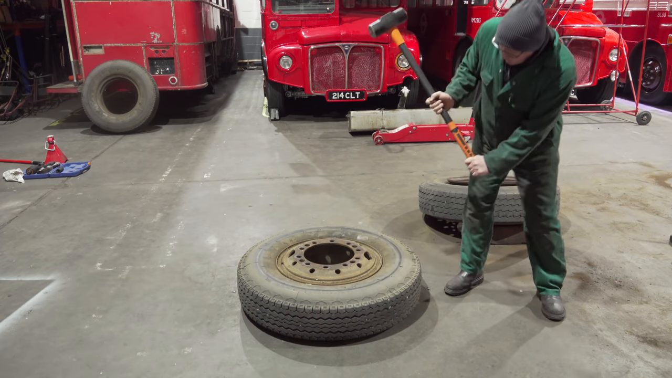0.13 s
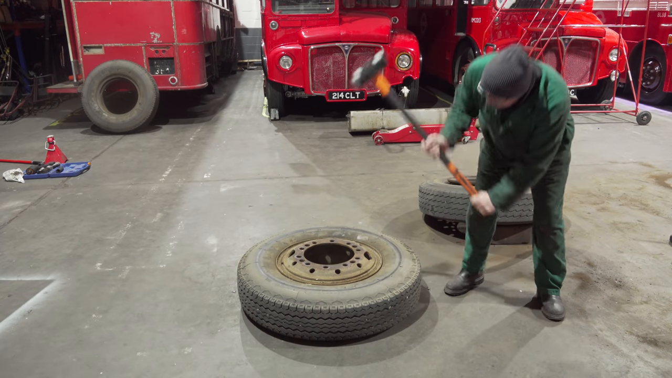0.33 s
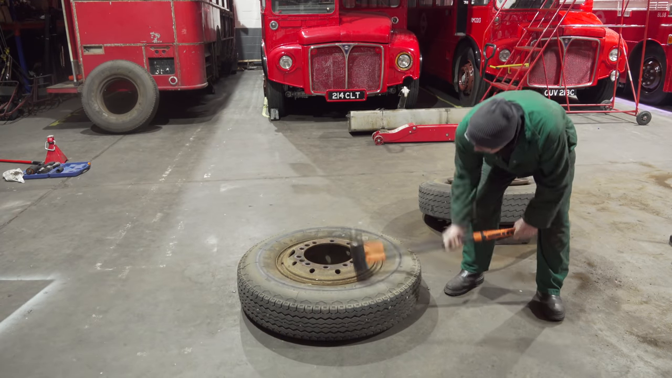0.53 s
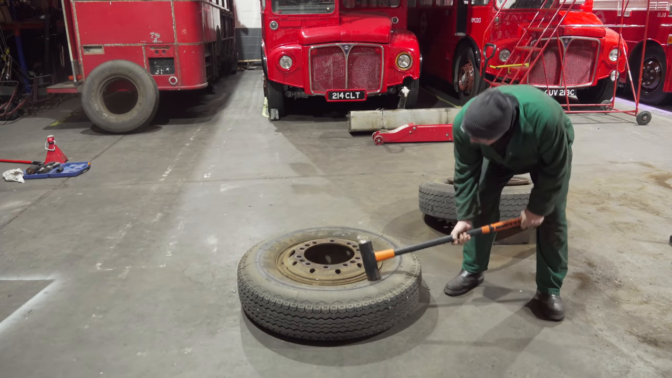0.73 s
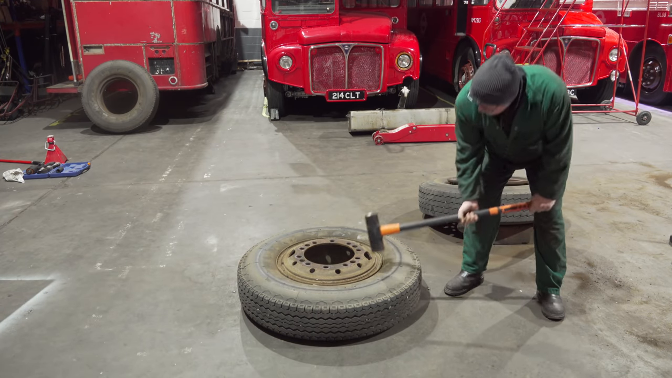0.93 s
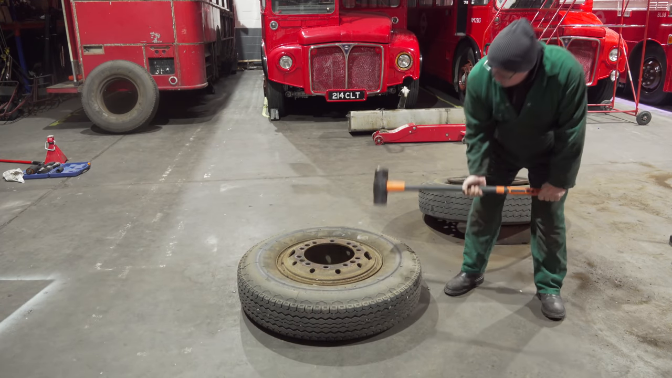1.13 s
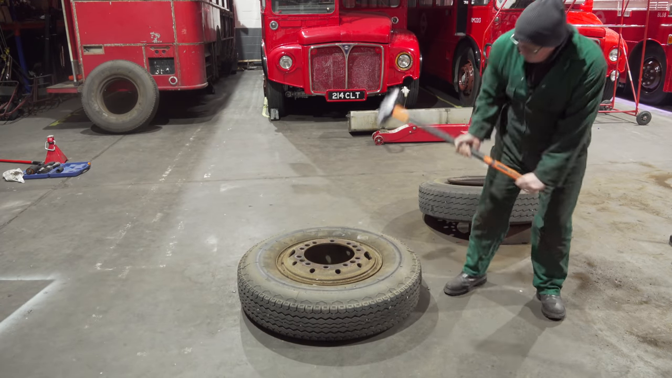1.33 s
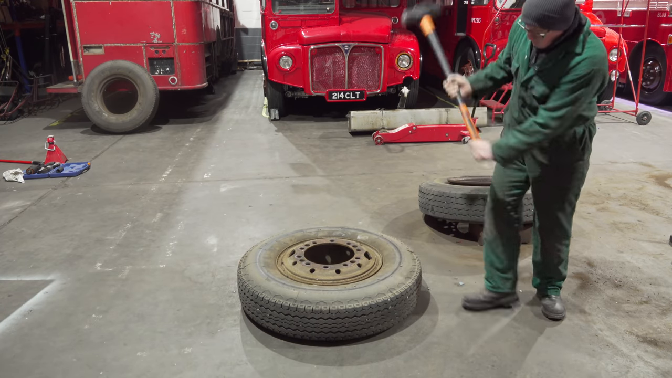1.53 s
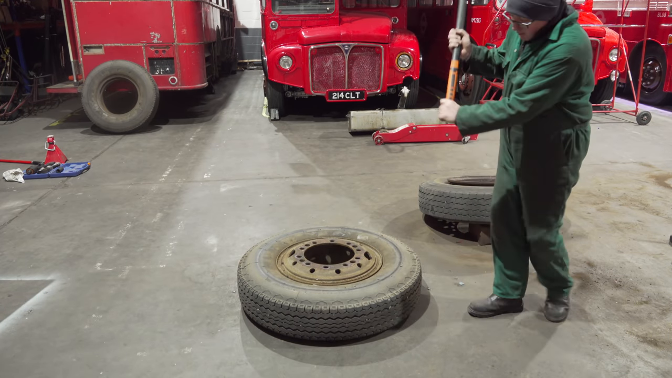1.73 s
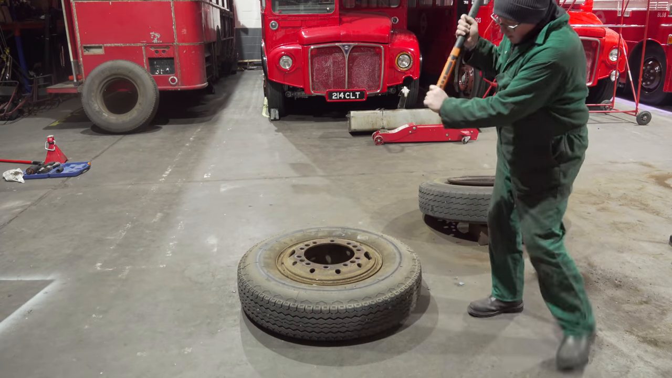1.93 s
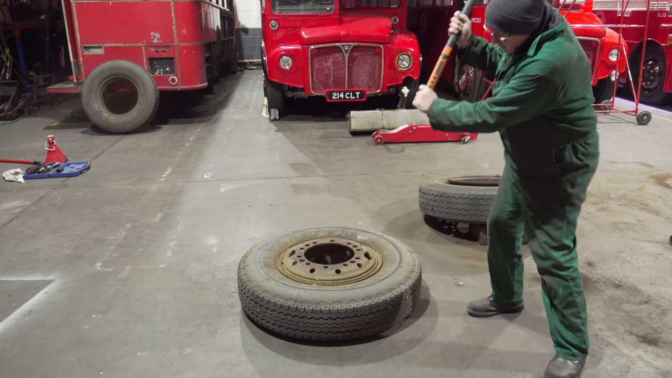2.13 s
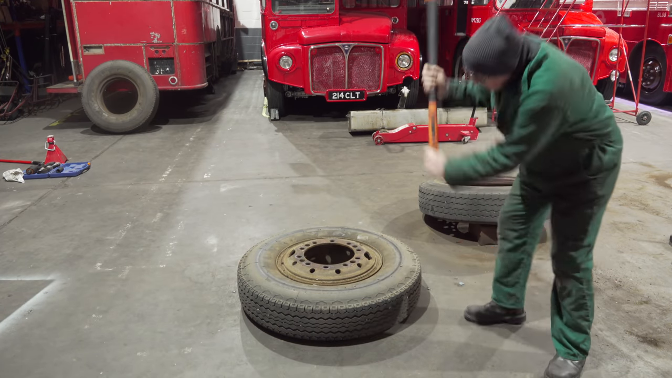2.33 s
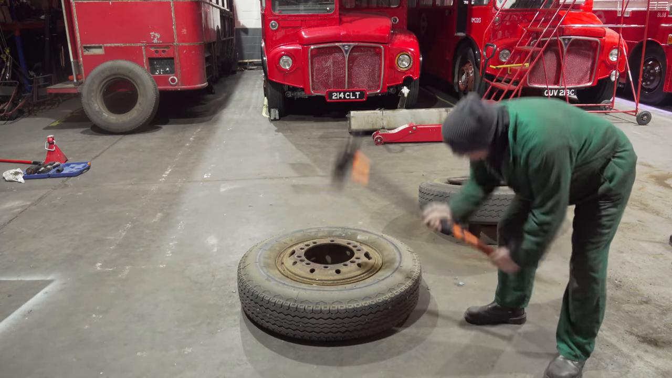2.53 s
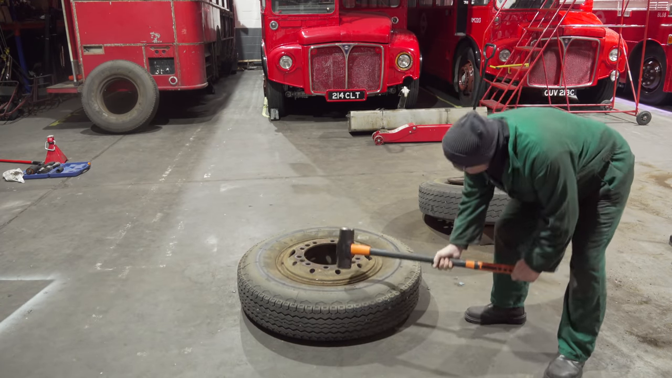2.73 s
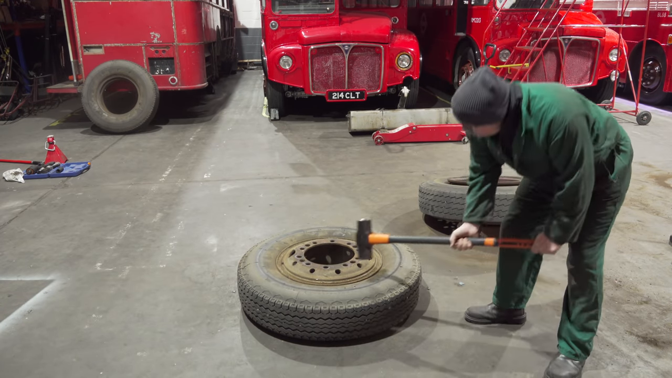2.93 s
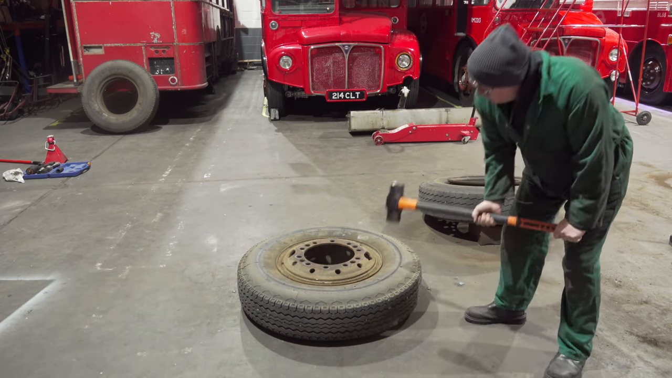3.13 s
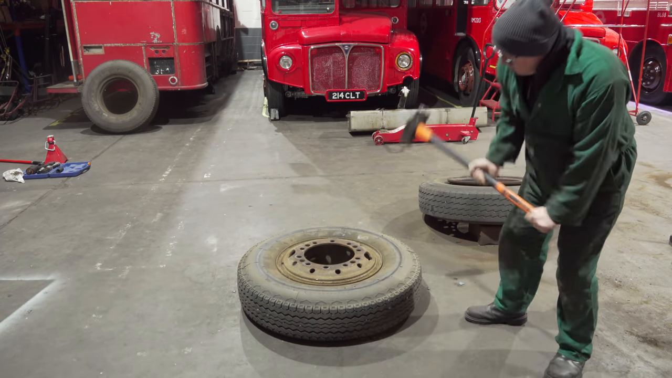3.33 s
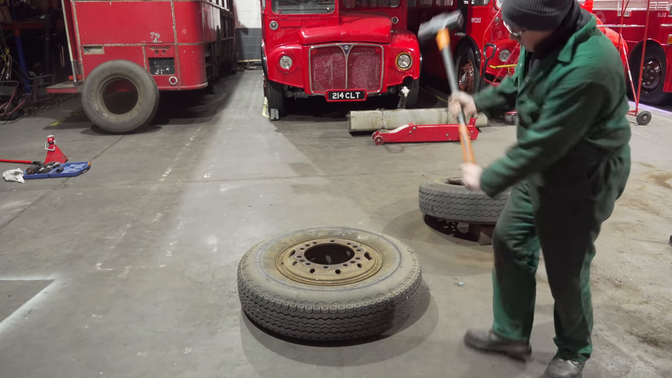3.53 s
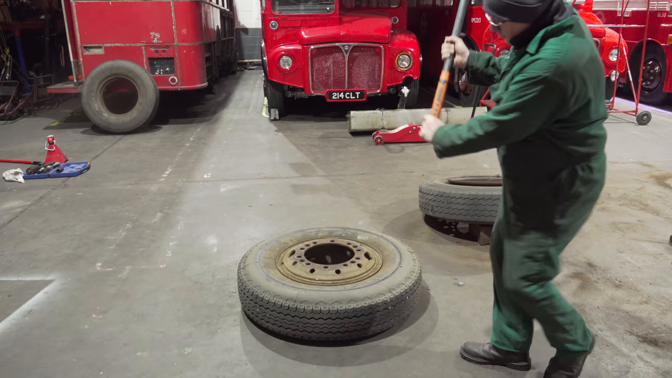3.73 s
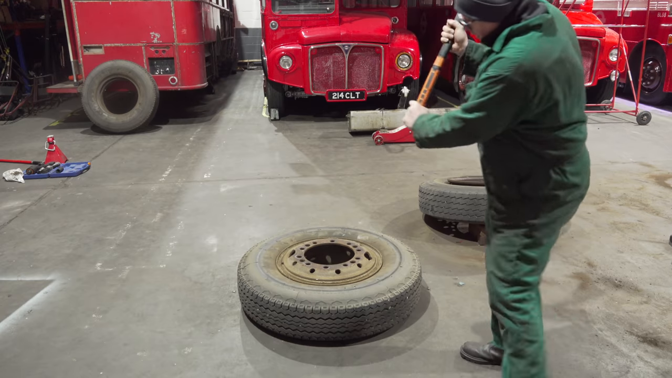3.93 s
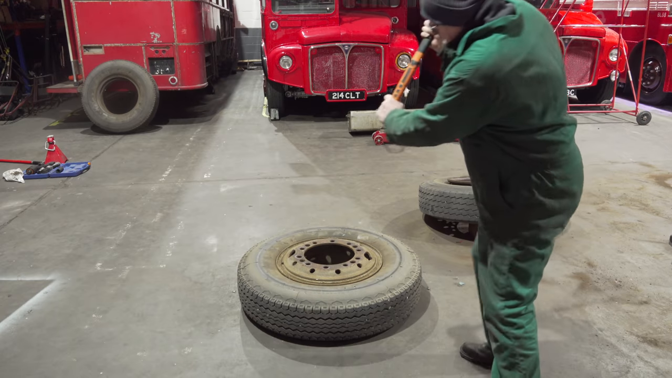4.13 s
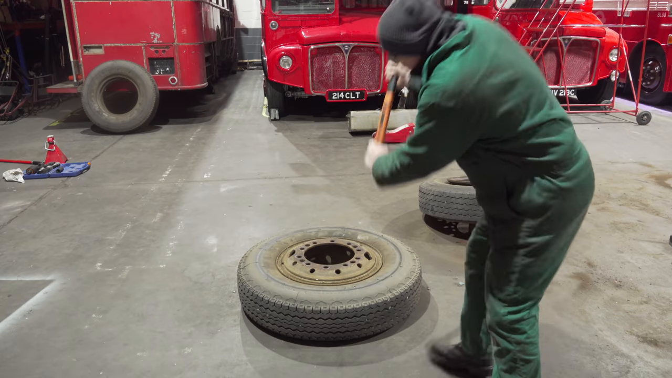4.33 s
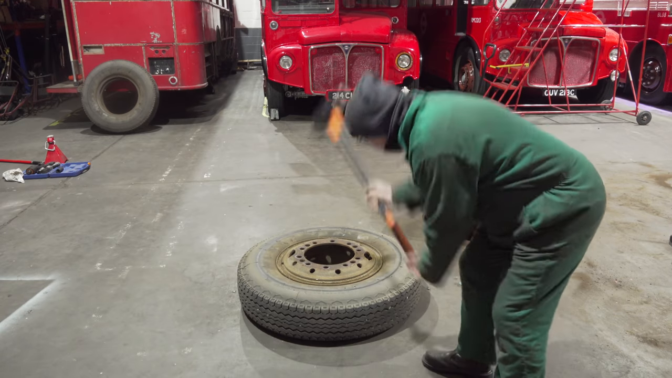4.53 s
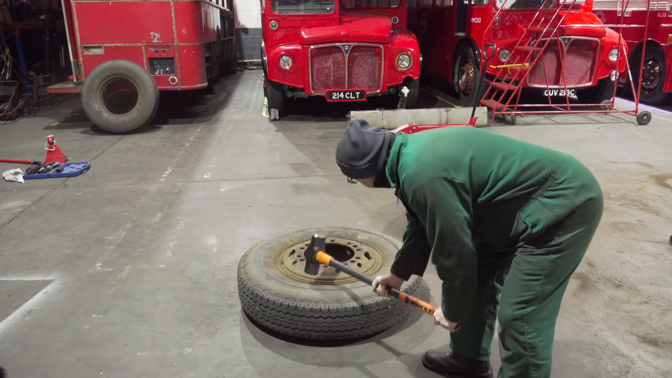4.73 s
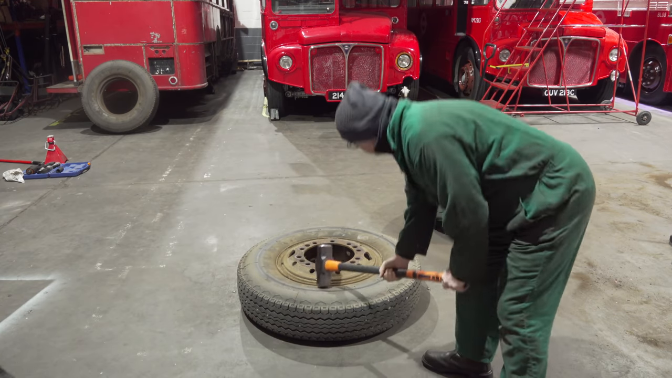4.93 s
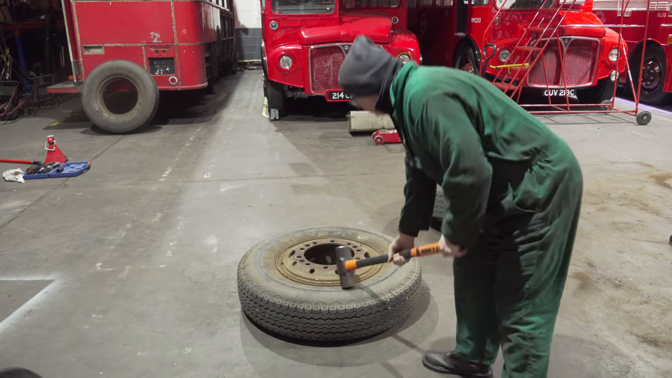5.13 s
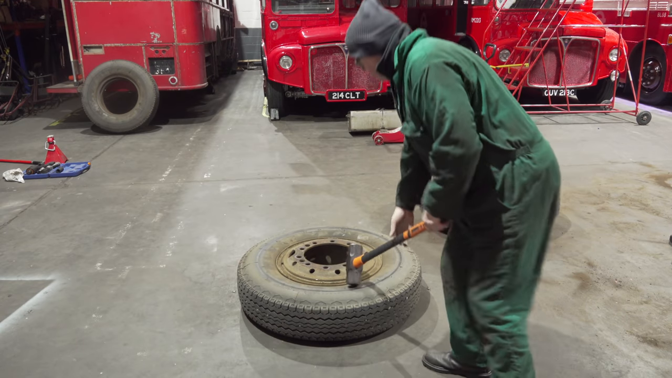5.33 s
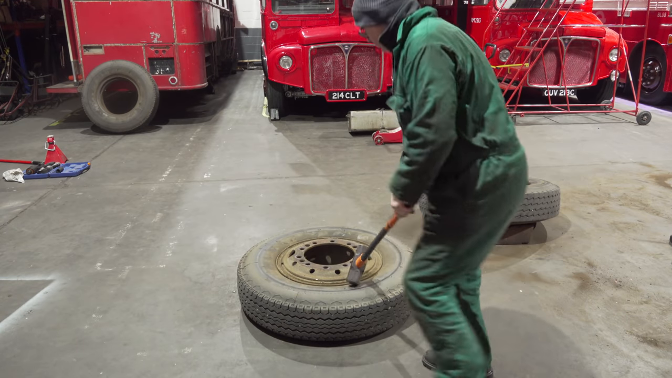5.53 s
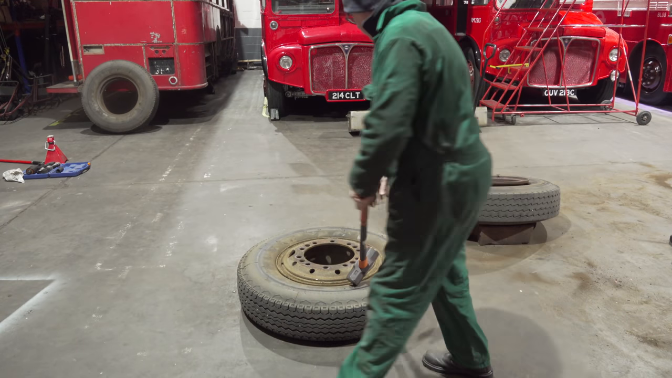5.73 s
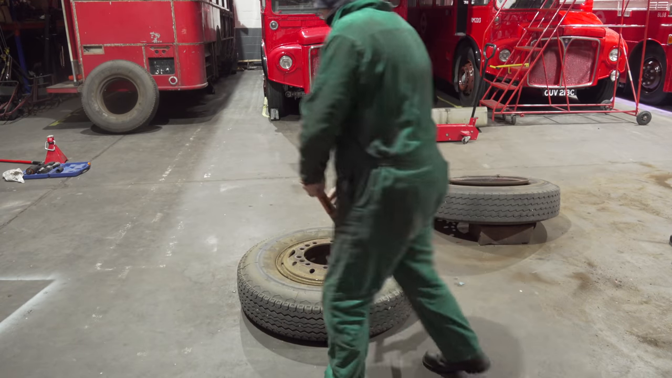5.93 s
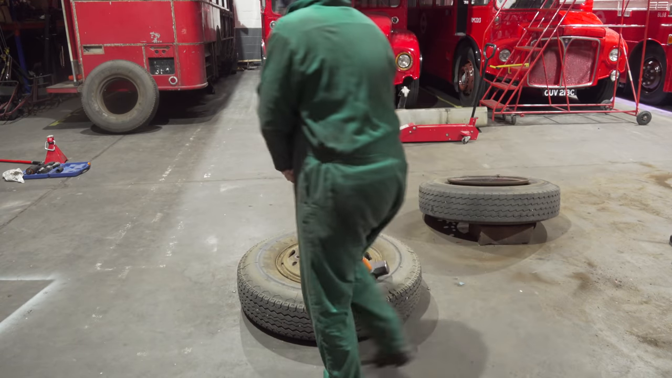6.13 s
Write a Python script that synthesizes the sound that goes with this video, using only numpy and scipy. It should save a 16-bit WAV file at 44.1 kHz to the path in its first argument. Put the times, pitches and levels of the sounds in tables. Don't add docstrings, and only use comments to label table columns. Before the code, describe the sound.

Three widely spaced sledgehammer blows on a heavy tyre with a steel rim, about two seconds apart. Each is a very loud, blunt thump fused with a bright, noisy metal crack and short rim ring, followed by a diffuse hall tail that rises as the limiter recovers. Between them come quiet boot taps, grit crunches, cloth rubs, a hollow panel knock and loose steel rattling. Faint hiss underneath; the mono microphone is near the work in a big hard-walled garage.

```python
import sys
import numpy as np
from scipy import signal
from scipy.fft import rfft, irfft
from scipy.io import wavfile
from scipy.ndimage import minimum_filter1d

SR = 44100
rng = np.random.default_rng(int(sys.argv[2]) if len(sys.argv) > 2 else 0)


def undo_db(level):
    steps = np.asarray(level, float) / 20
    return 10 ** steps


def waveform_to_disk(signal):
    frames = np.transpose(np.atleast_2d(signal))
    scaled = np.clip(frames, -1, 1) * 32767
    samples = np.round(scaled).astype(np.int16)
    wavfile.write(sys.argv[1], SR, samples)


N = 276938

# (frequency [Hz], level [dB], t60 [s])
PANEL_MODES = [(171, -12, 0.088), (520, -1.5, .015), (850, -3, .02), (1180, -6, .022), (2175, -15, .05),
               (2420, -17, .03), (3400, -27, .02)]


def at_hz(points, hz):
    table_hz, values = np.array(points).T
    return np.interp(np.log(hz + 1), np.log(table_hz), values)


def add(track, s, sound):
    i = round(s * SR)
    sound = sound[max(-i, 0):N - i]
    start = max(i, 0)
    track[start:start + len(sound)] += sound


def damped(hz, t60_s, length_s):
    t = np.arange(round(length_s * SR)) / SR
    return np.sin(2 * np.pi * hz * t) * undo_db(-60 * t / t60_s)


def resonate(x, hz, width_hz):
    r = np.exp(-np.pi * width_hz / SR)
    zeros = np.array([1, 0, -1]) * (1 - r * r) / 2
    poles = [1, -2 * r * np.cos(2 * np.pi * hz / SR), r * r]
    return signal.lfilter(zeros, poles, x)


def floor():
    # (frequency [Hz], density [dB per Hz])
    noise_spectrum = [(25, 3), (60, -7), (120, -8.5), (200, -2.5), (500, -4.5), (1000, -2.5), (2000, -2.5),
                      (4000, -6), (6300, -13), (10000, -17), (15700, -16), (16300, -54)]
    rms_db = -70.5
    shape = undo_db(at_hz(noise_spectrum, np.arange(N // 2 + 1) * SR / N))
    hiss = irfft(rfft(rng.standard_normal(N)) * shape, N)
    return undo_db(rms_db) * hiss / hiss.std()


def scuffs():
    # (start [s], length [s], rms [dB], centre [Hz])
    drags = [(-.01, 0.068, -52.5, 3460), (1.59, 0.062, -59.5, 4020), (2.042, 0.048, -58.5, 3300),
             (2.174, 0.1, -67, 2800), (2.352, 0.076, -58.5, 3800), (3.598, 0.069, -56, 3400),
             (4.408, 0.032, -62, 2800), (4.624, .028, -47, 3000), (4.652, 0.054, -49.5, 2800),
             (5.762, 0.088, -72.5, 4990)]
    # (start [s], length [s], rms [dB], centre [Hz])
    slides = [(.022, .027, -48.5, 3780), (0.001, 0.029, -55, 9400), (.046, 0.28, -70, 2160),
              (0.001, 0.074, -62, 910), (1.699, .17, -65, 4570), (1.959, 0.044, -65.5, 8500),
              (2.055, 0.023, -67, 4730), (2.387, .035, -59, 2625), (3.702, 0.15, -74.5, 4100),
              (3.957, 0.094, -69.5, 6700), (4.006, 0.035, -61, 4600), (4.034, 0.088, -74.5, 3520),
              (4.149, 0.087, -66.5, 3800), (4.258, 0.01, -68.5, 7290), (4.335, 0.016, -71, 3980),
              (4.351, 0.14, -64.5, 260), (4.451, 0.012, -61.5, 2980), (3.621, .054, -58.5, 2460),
              (5.668, .021, -61, 5500), (5.812, .024, -70, 3516), (6.209, .094, -67, 305)]
    # (start [s], length [s], rms [dB], centre [Hz])
    hums = [(3.5, .14, -69.5, 170), (5.61, 0.23, -76, 168), (1.7, .12, -72.5, 670), (2.2, .15, -79, 1850),
            (.062, .2, -72.5, 1700)]

    white = rng.standard_normal(N + SR)
    grit = white * undo_db(3 * np.minimum(rng.exponential(1, N + SR), 4))
    below_9k = signal.butter(4, 9000, fs=SR, output="sos")
    grit = 0.3 * grit + 0.8 * signal.sosfiltfilt(below_9k, grit)

    out = np.zeros(N)
    for rows, octaves, rise in [(drags, 3.3, 0.4), (slides, 1.3, 0.42), (hums, 0.22, 0.1)]:
        for s, length_s, rms_db, hz in rows:
            count = round(length_s * SR)
            edges_hz = np.clip(hz * 2 ** (np.array([-0.5, 0.5]) * octaves), 40, 18000)
            band = signal.butter(3, edges_hz, "band", fs=SR, output="sos")
            start = round(s * SR) + 2000
            grains = signal.sosfilt(band, grit[start:][:count])
            stroke = np.interp(np.arange(count) / count, [0, rise, 0.8, 1], [0.38, 0.92, 0.57, 0.37])
            add(out, s, undo_db(rms_db) * stroke * grains / grains.std())
    return out


def knocks():
    # (frequency [Hz], level [dB], t60 [s])
    boot_modes = [(174, -10.5, 0.07), (403.4, -6.5, 0.011), (720, -1.5, 0.013), (1230, -2.5, 0.0034),
                  (2900, -15, .004)]
    stud_modes = [(8080, -3.5, .012), (14950, -1, .03)]
    loose_modes = [(165, -9.5, 0.031), (330, -3.5, .015), (870, -6.5, .012), (1870, -2.5, .02),
                   (2470, 2, 0.02), (3430, -8, .012), (4400, 2.5, 0.011), (6190, -5.5, .01),
                   (8200, -10.5, .008), (11100, -17.5, .015), (12600, -21, .02), (14650, -16.5, .02)]
    zip_modes = [(2700, -4, .01), (5200, -3, .012), (7330, -1, .012), (11650, -3, .022), (14800, -10, .018)]
    wheel_modes = [(100, -17, .05), (175.4, -9.5, 0.17), (271.4, -10.5, 0.044), (432, -0.5, 0.0083),
                   (745, -9, .014), (1233, -26, .12), (1497, -21.5, .14), (2810, -15, 0.0087)]
    # (time [s], level [dB], hardness [dB per octave])
    footfalls = [(.476, -68.5, -1.5), (1.657, -46.5, 3.8), (2.038, -50, 2), (2.402, -45, 5.5),
                 (3.991, -51, -.5), (4.456, -61.5, -1.5), (5.955, -61.5, -1)]
    stud_ticks = [(.277, -56.5, 0.3), (.37, -72, -0.2), (.41, -78, 1.5), (2.371, -54, 3)]
    panel_knocks = [
        (2.554, -37, 1),
    ]
    rattles = [(4.623, -45.5, -3), (4.628, -42, 0.3), (4.633, -48.5, 2.5), (4.641, -51.5, 1.5),
               (4.646, -53.5, 1.5), (4.6825, -52, 3), (4.687, -56, 3), (4.7075, -43, 8)]
    # (time [s], level [dB])
    zip_ticks = [(5.637, -57), (5.675, -60), (5.712, -66)]
    # (time [s], level [dB], frequency [Hz])
    grit_snaps = [(.051, -48, 2480), (.087, -56, 2500), (.147, -51.5, 2800), (.2323, -48, 1960),
                  (0.233, -50.5, 3290), (1.967, -47.5, 5060), (2.348, -61, 498), (2.35, -54, 2023),
                  (2.497, -55, 10490), (3.499, -46, 3850), (3.542, -46, 3500), (4.062, -57, 413),
                  (4.4062, -55, 800), (4.4067, -56, 1696), (4.471, -61, 540), (4.598, -56.5, 446)]

    # modes, hits, share reaching the hall [dB]
    bodies = [(boot_modes, footfalls, -6.5),
              (stud_modes, stud_ticks, -12),
              (PANEL_MODES, panel_knocks, -5.5),
              (loose_modes, rattles, -7),
              (zip_modes, [(s, db, 0) for s, db in zip_ticks], -12),
              (wheel_modes, [(6.114, -40.5, 0)], -5)]
    strikes = []
    for modes, hits, hall_db in bodies:
        for s, db, hard_db in hits:
            for hz, mode_db, t60_s in modes:
                level_db = db + mode_db + hard_db * np.log2(hz / 1000) + rng.normal(0, 1.5)
                strikes.append((s, level_db, hz * rng.normal(1, 0.01), t60_s, hall_db))
    for s, db, hz in grit_snaps:
        strikes.append((s, db, hz, 14 / hz, -12))

    near, sent = np.zeros((2, N))
    small = signal.butter(2, 110, "high", fs=SR, output="sos")
    for s, db, hz, t60_s, hall_db in strikes:
        touch = rng.standard_normal(60)
        contact = np.r_[1, 0.3 * touch * np.exp(-np.arange(60) / 8)]
        sound = signal.sosfilt(small, np.convolve(damped(hz, t60_s, 0.21), contact))
        sound *= undo_db(db) / np.abs(sound).max()
        add(near, s, sound)
        add(sent, s, undo_db(hall_db) * sound)
    return near, sent


def hall(near, around):
    # (frequency [Hz], t60 [s])
    decay_t60 = [(60, 1.4), (160, 0.91), (420, 1.2), (1100, 1.413), (2900, 1.282), (4300, 1.106),
                 (6000, 0.86), (9000, 0.61), (15000, 0.3)]
    # (frequency [Hz], level [dB])
    colour = [(30, -11.5), (80, -8.5), (200, 7), (500, 2), (900, -0.5), (1300, -4.5), (2500, 1), (4500, 0),
              (8000, 0.5), (15000, -3)]
    # (delay [s], level [dB])
    echoes = [(.0065, -11), (0.0242, -11.5), (0.032, -10.5), (.047, -20)]
    tail_db, build_up_s = 1 - 36, 0.028

    count = 2 * SR
    t = np.arange(count) / SR
    edges_hz = 22 * 2 ** np.arange(0, 9.8, 1 / 5)
    white = rng.standard_normal((2, count))
    tail = np.zeros(count)
    for k, (low, high) in enumerate(zip(edges_hz, edges_hz[1:])):
        hz = np.sqrt(low * high)
        band = signal.butter(2, [low, high], "band", fs=SR, output="sos")
        decay_db = at_hz(colour, hz) - 60 * t / at_hz(decay_t60, hz)
        tail += signal.sosfilt(band, white[k % 2]) * undo_db(decay_db)
    tail *= undo_db(tail_db) * (1 - np.exp(-(t / build_up_s) ** 2))

    out = signal.fftconvolve(around, tail)[:N]
    for delay_s, db in echoes:
        add(out, delay_s, undo_db(db) * near)
    return out


def steel(force):
    # (frequency [Hz], width [Hz], level [dB])
    resonances = [(910, 583, 1.5), (2800, 1680, -3), (4100, 1196, 1), (6700, 2000, -5), (8050, 1500, -6),
                  (11160, 1100, -15), (15100, 6900, -21)]
    out = 0
    for k, (hz, width_hz, db) in enumerate(resonances):
        out = out + (-1) ** k * undo_db(db) * resonate(force, hz, width_hz)
    return out


def blow(s, thump_db, thump_hz, crack_db, delay_s):
    # (frequency [Hz], level [dB], t60 [s])
    rim_modes = [(137.8, 3.5, 0.32), (640, -13, 0.1), (738, -2, 0.28), (1013, 5, 0.17), (1262, -2, 0.44),
                 (1493, 3, 0.36), (1910, -6.5, 0.2), (2480, -4, .12), (2540, -5.5, 0.1), (2894, -9, 0.2),
                 (3650, -9, 0.14), (3970, -4.5, 0.12)]
    rim_db, chatter_s, yield_s = -33.5, 0.019, 0.00036
    rubber, near = np.zeros((2, N))
    t = np.arange(2000) / SR
    crack_s = s + delay_s

    dent = damped(thump_hz, 0.0041, 0.05)
    dent *= 1 - np.exp(-np.arange(len(dent)) / SR / yield_s)
    add(rubber, s, -undo_db(thump_db + 1) * dent)
    add(rubber, s, -undo_db(thump_db - 14) * damped(500, 0.0095, 0.1))
    add(rubber, s, -undo_db(thump_db - 20) * damped(120, 0.03, 0.2))
    flutter = damped(thump_hz * 1.1, 0.07, 0.087)
    add(near, s + 0.005, undo_db(thump_db - 15.5) * flutter)

    hammer_face = damped(4150, 0.016, 0.05) + 0.52 * damped(2800, 0.045, 0.05)
    add(near, crack_s, undo_db(crack_db - 7.5) * hammer_face)
    fade = undo_db(-9 * t / chatter_s - 15 * (t / chatter_s) ** 4)
    chatter = steel(rng.standard_normal(len(t)) * fade)
    add(near, crack_s, undo_db(crack_db + 6.5) * chatter)
    for hz, db, t60_s in rim_modes:
        add(rubber, s, undo_db(rim_db + db + rng.normal(0, 1)) * damped(hz, t60_s, 0.4))
    snap = np.diff(rng.standard_normal(len(t) + 1)) * undo_db(-9 * t / 0.0007)
    add(near, crack_s, undo_db(crack_db - 7) * snap)
    first_touch = steel(rng.standard_normal(len(t)) * undo_db(-9 * t / 0.0015))
    add(near, s - 0.0006, undo_db(crack_db - 27) * first_touch)

    around = rubber.copy()
    smooth_crack = steel((t == 0) * np.linalg.norm(fade))
    add(around, crack_s, undo_db(crack_db + 9.5) * smooth_crack)
    return rubber + near, around


def buzz():
    start_s, length_s, rms_db = 2.562, 0.11, -50.5
    width_hz, fade_db = 170, -4.5
    count = round(length_s * SR)
    bands = np.zeros(count)
    for hz, mode_db, _ in PANEL_MODES:
        contacts = rng.standard_normal(count)
        narrow = resonate(contacts, hz, width_hz)
        bands += undo_db(mode_db) * resonate(narrow, hz, 2.4 * width_hz)
    out = np.zeros(N)
    add(out, start_s, undo_db(rms_db + np.linspace(0, fade_db, count)) * bands / bands.std())
    return out


def scene():
    # (time [s], thump level [dB], thump frequency [Hz], crack level [dB], crack delay [s])
    blows = [
        (0.6016, 0, 613, -8, 0.00025),
        (2.6715, 1.5, 538, -7, 0.0014),
        (4.708, 1, 553, -7.5, 0.0014),
    ]
    knock, sent = knocks()
    scuff = scuffs() + buzz()
    small = sent + undo_db(-7) * scuff
    out = knock + scuff + hall(small, small) + floor()
    for row in blows:
        near, around = blow(*row)
        out += near + hall(near, around)
    return out[None]


def limiter(x):
    ceiling_db, release_db_per_s = -13, 120
    hold_s, attack_s = 0.00043, 0.0034
    squash_peak = 0.42
    over_db = np.maximum(20 * np.log10(np.abs(x) + 1e-9) - ceiling_db, 0)
    half = round(hold_s * SR) // 2
    held_db = -minimum_filter1d(-over_db, 2 * half + 1, origin=half)
    climb_db = release_db_per_s * np.arange(N) / SR
    cut_db = np.maximum.accumulate(held_db + climb_db) - climb_db
    r = np.exp(-1 / (attack_s * SR))
    ducked = x * undo_db(-signal.lfilter([1 - r], [1, -r], cut_db))
    return squash_peak * np.tanh(ducked / squash_peak)


def band_limit(x):
    return signal.sosfilt(signal.butter(12, 17040, fs=SR, output="sos"), x)


def record(dry):
    bass_cut = signal.butter(2, 90, "high", fs=SR, output="sos")
    top_cut = signal.cheby2(10, 34, 16150, fs=SR, output="sos")
    x = limiter(signal.sosfilt(bass_cut, dry[0]))
    mix = signal.sosfilt(top_cut, x)[None]
    return band_limit(mix)


dry = scene()
out = record(dry)
waveform_to_disk(out)
```